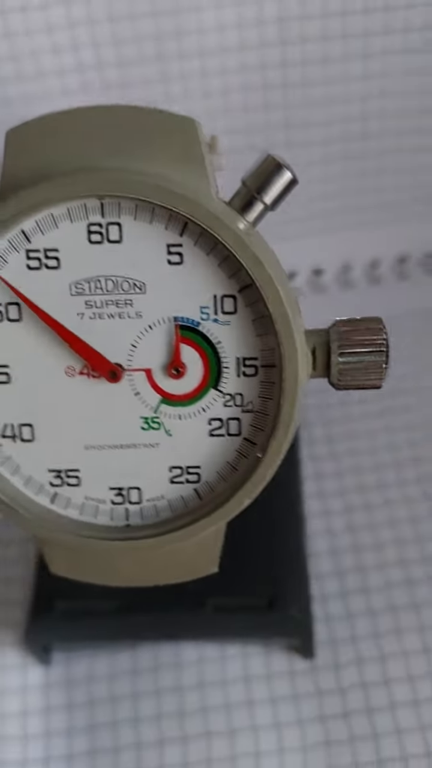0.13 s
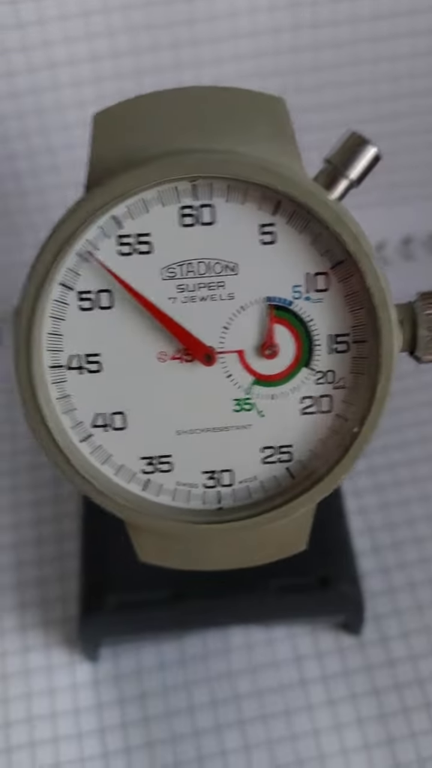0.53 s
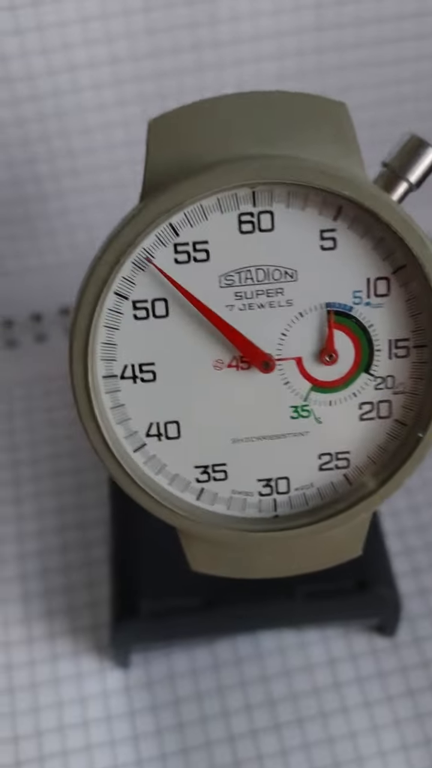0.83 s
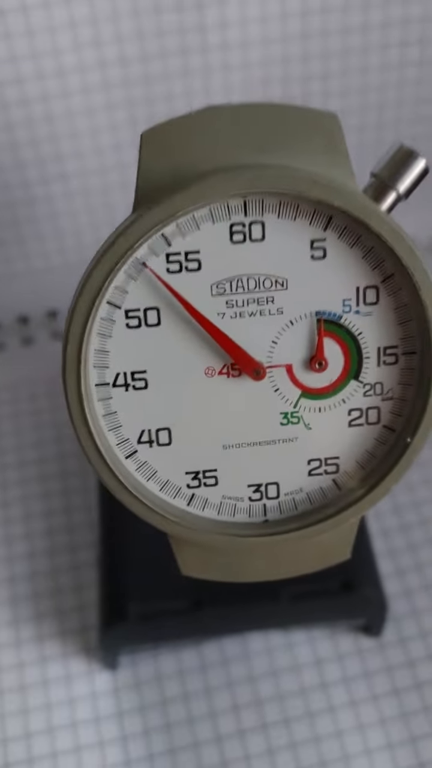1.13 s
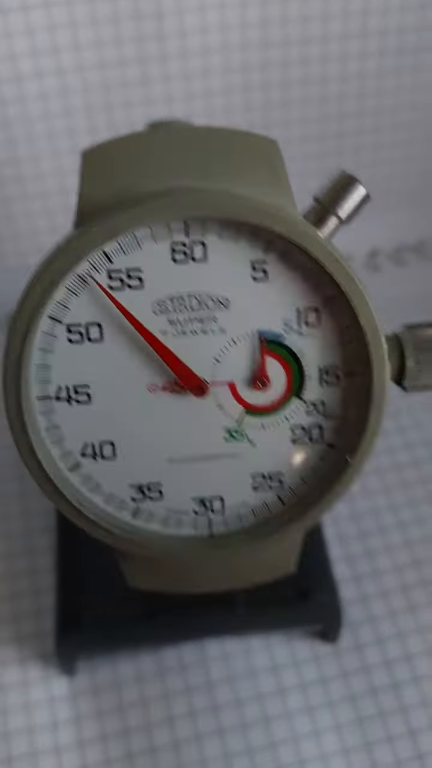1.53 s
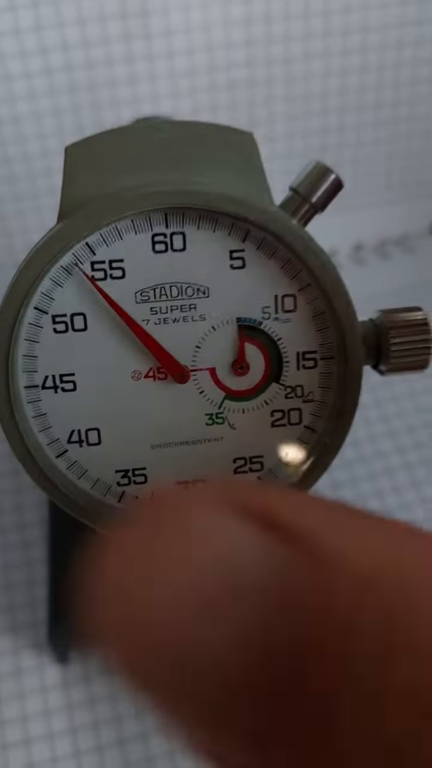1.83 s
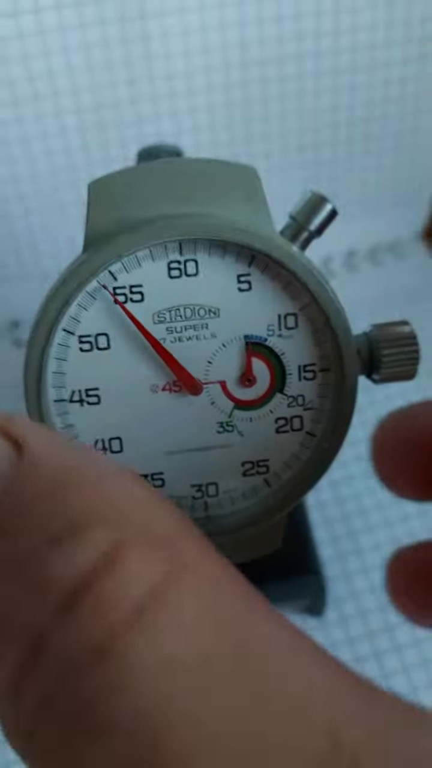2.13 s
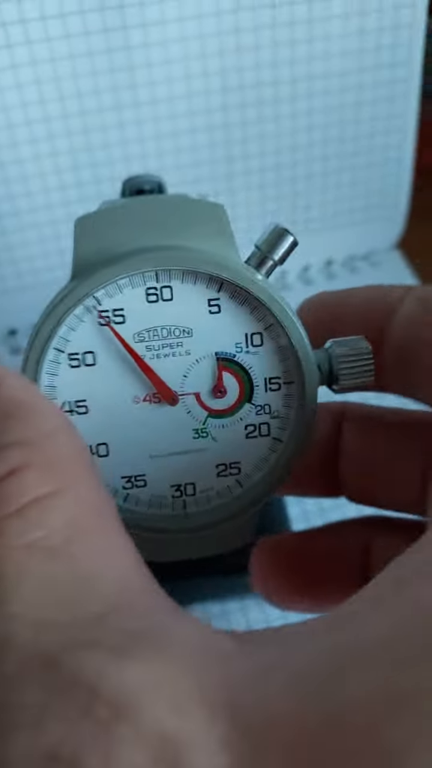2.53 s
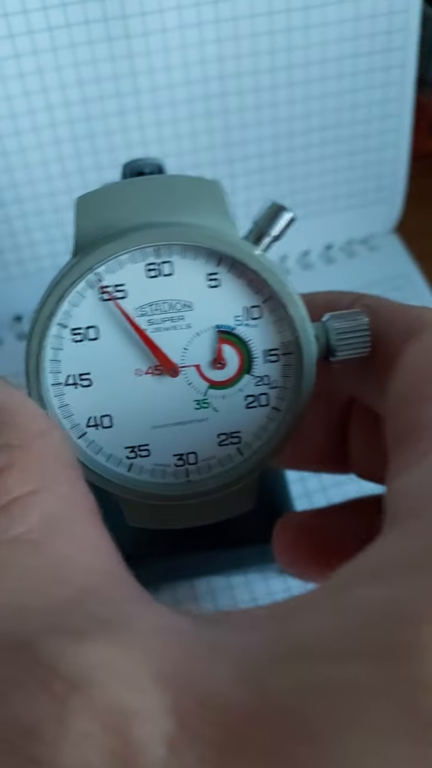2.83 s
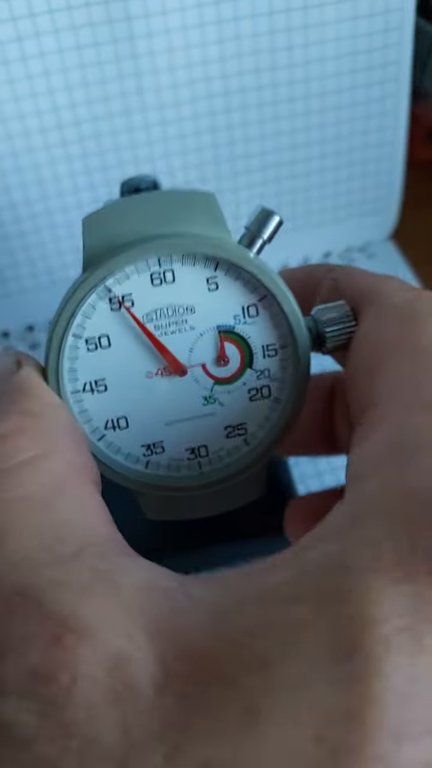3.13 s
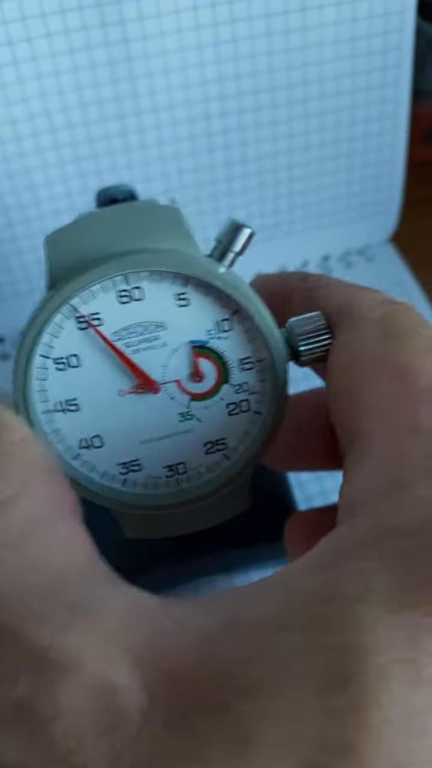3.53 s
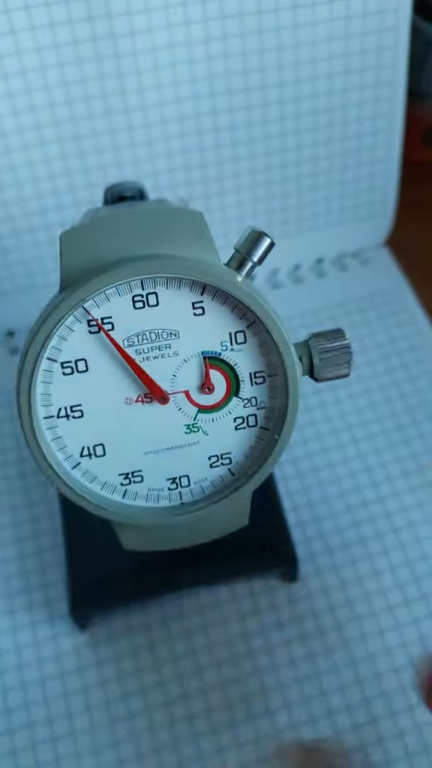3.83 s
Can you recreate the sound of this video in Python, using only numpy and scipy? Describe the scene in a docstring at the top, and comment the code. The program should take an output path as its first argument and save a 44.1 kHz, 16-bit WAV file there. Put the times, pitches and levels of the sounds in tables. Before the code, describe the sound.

A mechanical stopwatch ticks faintly, about five beats a second, close up in a quiet, hissy room with low handling rumble and very faint distant bird-like chirps. Fingers rub and knock the camera around 1.2-1.4 s, strongly on the right; a dull bump follows at 1.6. After a tiny creak at 3.14, the button snaps loudly at 3.34, spring ringing high; ticking stops. It clicks back at 3.57, with small rattles until 3.74.

```python
"""A quiet room, close up: a mechanical stopwatch ticks on its plastic stand, near a hand-held camera.
Ticks, taps, clacks and button strokes are short coloured noise bursts; spring, hum and thud are dying sines.
Fingers rub and knock on the camera, then slip on the watch: the button snaps down and the ticking stops.
The button clicks back and the watch rattles. Faint arched chirps, probably birds, come from far away.
Handling rumble, hiss and room air are shaped noise; short reflections and a diffuse tail place the watch."""
import sys
import numpy as np
from scipy import signal
from scipy.fft import rfft, irfft
from scipy.io import wavfile
from scipy.ndimage import uniform_filter1d

SR = 44100
rng = np.random.default_rng(int(sys.argv[2]) if len(sys.argv) > 2 else 0)


def store_wav(level_fs):
    """Save 16-bit WAV to argv[1]."""
    pcm = np.round(np.clip(np.atleast_2d(level_fs), -1, 1) * 32767)
    wavfile.write(sys.argv[1], SR, pcm.T.astype(np.int16))


N = 176400

# Throughout, side/dB is right minus left: the level belongs to the right channel.
# Spectra are relative: each sound's own level sets how loud it is.

# room air and hiss: spectrum on the right [f/Hz, level/dB]
FLOOR_COLOUR = [(59, -30), (100, 0), (147, -10), (197, -15), (266, -15), (415, -20), (461, -18), (648, -20),
                (1080, -21), (2080, -35), (3190, -34), (4290, -27), (5770, -28), (7140, -32), (8110, -41),
                (15000, -32), (16000, -38)]
# how much louder the air and hiss are on the right [f/Hz, side/dB]
FLOOR_SIDE = [(100, 3), (380, 8), (1300, 7), (2400, 5), (4400, 10), (8000, 7), (15000, 9)]
FLOOR_DB, FLOOR_DRIFT_DB = -66.5, 1.6
# handling rumble over time, before its trim [t/s, level/dB]
RUMBLE_LEVEL = [(0.0, -75), (0.03, -62), (0.21, -52), (0.3, -68), (0.44, -65), (0.54, -51), (0.62, -52),
                (0.68, -73), (0.79, -56), (0.86, -69), (1.0, -67), (1.06, -55), (1.19, -55), (1.25, -44),
                (1.37, -55), (1.45, -49), (1.54, -71), (1.58, -52), (1.92, -65), (1.96, -55), (2.25, -78),
                (2.36, -57), (3.1, -62), (3.14, -53), (3.26, -62), (3.35, -50), (3.38, -60), (3.6, -56),
                (3.82, -67), (4.0, -50)]
# rumble spectrum [f/Hz, level/dB]
RUMBLE_COLOUR = [(15, -45), (30, -22), (45, -6), (60, 0), (75, -4), (110, -17), (200, -33), (400, -55),
                 (1000, -80)]
RUMBLE_TRIM_DB, RUMBLE_SIDE_DB, RUMBLE_LIKENESS = 1.5, 2, .8
# escapement, two unlike beats [first drop t/s, drop level/dB, unlock lead/s, unlock level/dB]
BEATS = [(.1858, -50, .0125, -59), (.3828, -54, .008, -67)]
# tick spectrum [f/Hz, level/dB]
TICK_COLOUR = [(500, -25), (2500, -16), (4200, -4), (6500, 0), (8500, -11), (11500, 0), (13500, -2),
               (16000, -2)]
BALANCE_PERIOD_S, TICK_DECAY_S, UNLOCK_DECAY_S = .4, .0016, .0035
TICK_SIDE_DB, TICK_SPREAD_DB = 11, 1.5
# reflections off the table, notebook and hand [delay/s, level/dB]
NEARBY = [(.0042, -21), (.0068, -22), (.0093, -21), (.0135, -23), (.021, -26), (.029, -28)]
# decay of the room [f/Hz, t60/s]
ROOM_DECAY = [(200, .4), (800, .32), (2000, .21), (6000, .2), (15000, .18)]
ROOM_DB, ROOM_SIDE_DB, ECHO_GAP_S = -11, 2, .003
# far chirps, before the distance gains [t/s, length/s, level/dB, nominal f/Hz]
CHIRPS = [(.195, .06, -60, 4600), (.55, .07, -65, 4700), (.785, .06, -56.5, 4850), (1.08, .012, -56, 4800),
          (1.106, .016, -55, 4900), (1.13, .025, -59, 4950), (1.345, .06, -66, 5500),
          (1.79, .05, -69, 4700), (1.99, .06, -62, 4600), (2.125, .06, -67, 4400),
          (2.315, .05, -62.5, 4500), (2.56, .08, -70, 4900), (2.915, .06, -63.5, 4600)]
CHIRP_ARCH, CHIRP_WARBLE = .2, .12  # pitch swings, as fractions of the nominal pitch
CHIRP_WARBLE_HZ, CHIRP_SIDE_DB = 250, 6
YARD_T60_S, CHIRP_DIRECT_DB, CHIRP_ECHO_DB = .26, -7, -1
# fingers rub along the camera, before the channel balance and colour [t/s, length/s, level/dB]
RUBS = [(1.17, .15, -63), (1.33, .1, -63)]
# rubbing spectrum [f/Hz, level/dB]
RUB_COLOUR = [(150, 12), (500, 11), (1300, 4), (2500, 0), (6500, 2), (8500, -8), (11000, -2), (16000, -2)]
RUB_SIDE_DB = 9
# finger taps on the camera body [t/s, level/dB, decay/s]
TAPS = [(1.2135, -33, .0016), (1.2471, -15, .0006), (1.2500, -33, .0035), (1.2660, -45, .001),
        (1.2835, -50, .003), (1.2935, -53, .002)]
# tap spectrum [f/Hz, level/dB]
TAP_COLOUR = [(100, 4), (500, 5), (1400, 4), (2200, 1), (3000, 2), (5000, 1), (7000, 0), (8500, -11),
              (10500, -4), (16000, -7)]
TAP_SIDE_DB = 27
# thud of the camera body under the hardest tap [f/Hz, level/dB, t60/s, side/dB]
THUD = [(66, -43, .14, 6), (125, -29, .055, 23), (204, -24.5, .04, 28), (408, -26, .018, 28),
        (620, -27, .014, 26)]
THUD_S = 1.2448
# one soft bump further off [t/s, level/dB, decay/s, side/dB]
BUMP = (1.592, -52, .035, 4)
# bump spectrum [f/Hz, level/dB]
BUMP_COLOUR = [(60, -20), (170, -8), (240, 0), (340, -10), (500, -19), (750, -22), (1500, -40), (4000, -70)]
# fingers slip on the case [t/s, length/s, level/dB, peak slips per s]
CREAK = (3.139, .034, -51, 3000)
# modes of the plastic case [f/Hz, relative level/dB, t60/s]
CASE = [(937, 3, .035), (1230, -8, .02), (1450, -3, .025), (2820, 2, .008), (4300, -4, .003),
        (6500, -3, .002)]
# small clacks around both strokes, one just ahead of the press [t/s, level/dB, side/dB]
CLACKS = [(3.1787, -39.5, 4), (3.2330, -58, 6), (3.3052, -40, 6), (3.3408, -30, 3), (3.6298, -33, 2),
          (3.6400, -44, 2), (3.6462, -40, 2), (3.6568, -35.5, 2), (3.6790, -46, 2), (3.7378, -54, 7)]
# clack spectrum [f/Hz, level/dB]
CLACK_COLOUR = [(150, -8), (450, -6), (750, 6), (1100, 1), (1600, -3), (2700, 1), (4500, -4), (7000, -1),
                (8800, -9), (11000, -7), (16000, -5)]
CLACK_DECAY_S = .0021
# button going down [t/s, level/dB, decay/s, side/dB]
PRESS = (3.3424, -5, .0015, 2)
# press spectrum [f/Hz, level/dB]
PRESS_COLOUR = [(100, -22), (400, -20), (700, -11), (1300, -7), (1650, -11), (2100, -4), (2700, -5),
                (3400, -6), (4300, -1), (5100, -5), (6100, .5), (7500, -3), (8600, -10), (10500, -6),
                (11700, -13), (14500, -7), (16000, -16)]
# button coming back [t/s, level/dB, decay/s, side/dB]
RELEASE = (3.5697, -14.5, .0017, 7)
# release spectrum [f/Hz, level/dB]
RELEASE_COLOUR = [(100, -20), (450, -23), (1000, -11), (1700, -17), (2500, -3), (3300, -8), (5200, -9),
                  (6800, 0), (7700, -1), (8800, -10), (10300, -4), (11600, -7), (13000, 0), (16000, -6)]
# loosened case shivering on its stand, from the release on [level/dB, decay/s, side/dB]
SHIVER = (-42.5, .032, 4)
# shiver spectrum [f/Hz, level/dB]
SHIVER_COLOUR = [(150, -6), (450, -6), (800, 4), (1600, -6), (2600, 1), (4500, -3), (7000, -3), (8800, -9),
                 (10500, -3), (16000, -3)]
# spring set ringing by the press [f/Hz, level/dB, t60/s, side/dB]
SPRING = [(5254, -42, .28, 3), (5308, -27.5, .25, 7), (10488, -39, .25, -2)]
# low hum and brief mid-band ring under the press [f/Hz, level/dB, t60/s, side/dB]
PRESS_HUM = [(120, -46, .12, 4), (188, -43, .17, 5), (280, -42, .17, 3), (2066, -35, .025, -6),
             (2427, -36, .025, 4)]
# contacts at the two microphone ports
SNAP_ATTACK_S, PORT_LAG_S, PORT_LIKENESS = .0003, .00017, .6
LOW_CUT_HZ, EDGE_HZ = 35, 16300


def amp(db):
    """Decibels to gain."""
    return 10 ** (np.asarray(db) / 20)


def unit(x):
    """Scales to rms 1."""
    return x / np.sqrt(np.mean(x ** 2) + 1e-30)


def read(points, hz):
    """Reads a table on a log-frequency axis."""
    f, value = np.transpose(points)
    return np.interp(np.log(hz + 1), np.log(f + 1), value)


def add(mix, s, sound):
    """Mixes a sound in at time s, cut off at the end of the mix."""
    part = mix[..., round(s * SR):][..., :sound.shape[-1]]
    part += sound[..., :part.shape[-1]]


def sides(db):
    """Channel gains, the left one db below the right."""
    return amp([[-db], [0]])


def pair(likeness, size):
    """Two partly alike white noises, one for each microphone port."""
    a, b = rng.standard_normal((2, size))
    c = np.clip(likeness, -1, 1)
    return np.array([a, c * a + np.sqrt(1 - c * c) * b])


def tint(x, colour, size=4096):
    """Causal minimum-phase filter of unit power gain with the given spectrum."""
    gain = unit(amp(read(colour, abs(np.fft.fftfreq(size, 1 / SR)))))
    spectrum = np.exp(np.conj(signal.hilbert(np.log(gain + 1e-7))))
    taps = np.fft.ifft(spectrum).real[:size // 2]
    return signal.oaconvolve(x, taps[None], axes=1)[:, :x.shape[1]]


def snap(db, decay_s, side_db, colour, size=12000):
    """A contact: a very short shudder of many dense modes, reaching the left port first."""
    t = np.arange(size) / SR
    attack = 1 - np.exp(-t / min(SNAP_ATTACK_S, decay_s / 4))
    shape = attack * np.exp(-t / decay_s)
    z = rfft(pair(PORT_LIKENESS, size) * shape)
    # level the chance peaks of the spectrum, then fade what that smears out in time
    smooth = np.sqrt(uniform_filter1d(abs(z) ** 2, size=150) + 1e-12)
    burst = irfft(z / smooth, size) * np.exp(-(t / decay_s / 5) ** 2)
    burst *= np.linalg.norm(shape) / np.linalg.norm(burst, axis=1, keepdims=True)
    burst[1] = np.roll(burst[1], round(PORT_LAG_S * SR))
    return amp(db) * sides(side_db) * tint(burst, colour)


def ring(modes):
    """Dying sines of a struck part."""
    t = np.arange(SR) / SR
    out = np.zeros((2, SR))
    for hz, db, t60, side_db in modes:
        decay = np.exp(-np.log(1000) * t / t60)
        out += sides(side_db) * amp(db) * decay * np.sin(2 * np.pi * hz * t)
    return out


def echo(x, decay, size=256):
    """Diffuse reflections: a noise tail in which each band dies at its own speed."""
    hz, t, z = signal.stft(rng.standard_normal((2, SR)), SR, nperseg=size)
    fade = np.exp(-np.log(1000) * t / read(decay, hz)[:, None])
    tail = signal.istft(z * fade, SR, nperseg=size)[1]
    tail *= np.arange(tail.shape[1]) / SR > ECHO_GAP_S
    tail /= np.linalg.norm(tail, axis=1, keepdims=True)
    return signal.fftconvolve(x[None], tail, axes=1)[:, :N]


def room_tone(size=1024):
    """Hiss, and air whose low and middle bands drift slowly in level."""
    hz, t, z = signal.stft(pair(.05, N), SR, nperseg=size)
    drift = rng.standard_normal(z.shape[1:])
    for axis in (0, 1):
        drift = uniform_filter1d(drift, size=9, axis=axis)
    drift_db = FLOOR_DRIFT_DB * unit(drift) / (1 + (hz[:, None] / 2500) ** 2)
    z *= amp(read(FLOOR_COLOUR, hz)[:, None] + drift_db)
    z[0] *= amp(-read(FLOOR_SIDE, hz))[:, None]
    return amp(FLOOR_DB) * unit(signal.istft(z, SR, nperseg=size)[1][:, :N])


def handling_rumble():
    """The holding hand rumbles: low noise, evened out and then following a level curve."""
    s, db = np.transpose(RUMBLE_LEVEL)
    out = unit(tint(pair(RUMBLE_LIKENESS, N), RUMBLE_COLOUR, size=16384))
    out /= np.sqrt(uniform_filter1d((out ** 2).mean(0), size=3000) + .05)
    level_db = RUMBLE_TRIM_DB + np.interp(np.arange(N) / SR, s, db)
    return out * sides(RUMBLE_SIDE_DB) * amp(level_db)


def escapement():
    """Five beats a second, each an unlock and then a drop, until the button stops the watch."""
    out = np.zeros((2, N))
    for first, drop_db, lead, unlock_db in BEATS:
        for s in np.arange(first, PRESS[0], BALANCE_PERIOD_S):
            vary = TICK_SPREAD_DB * rng.standard_normal()
            add(out, s - lead, snap(unlock_db + vary, UNLOCK_DECAY_S, TICK_SIDE_DB, TICK_COLOUR))
            add(out, s, snap(drop_db + vary, TICK_DECAY_S, TICK_SIDE_DB, TICK_COLOUR))
    return out


def reflections(watch):
    """The watch comes back from nearby surfaces as delayed copies and from the room as a diffuse tail."""
    mono = watch.sum(0) / np.sqrt(2)
    out = amp(ROOM_DB) * sides(ROOM_SIDE_DB) * echo(mono, ROOM_DECAY)
    for delay, db in NEARBY:
        add(out, delay, amp(db) * watch)
    return out


def birds():
    """Arched chirps, raspy from random pitch wobble and smeared by distance."""
    out = np.zeros(N)
    low_pass = signal.butter(2, CHIRP_WARBLE_HZ, fs=SR, output="sos")
    rasp = unit(signal.sosfilt(low_pass, rng.standard_normal(N)))
    for s, length, db, hz in CHIRPS:
        arch = np.sin(np.pi * np.arange(0, length, 1 / SR) / length)
        wobble = CHIRP_WARBLE * rasp[round(s * SR):][:len(arch)]
        pitch = hz * (1 + CHIRP_ARCH * (arch - np.pi / 4) + wobble)
        tone = np.sin(2 * np.pi * np.cumsum(pitch) / SR)
        add(out, s, amp(db) * np.sqrt(2 * abs(arch)) * tone)
    direct = amp(CHIRP_DIRECT_DB) * out
    far = amp(CHIRP_ECHO_DB) * echo(out, [(4500, YARD_T60_S)])
    return sides(CHIRP_SIDE_DB) * (direct + far)


def rubbing(grain_db=5):
    """Skin slides over the camera body in fine, uneven grains."""
    out = np.zeros((2, N))
    for s, length, db in RUBS:
        swell = np.sin(np.pi * np.arange(0, length, 1 / SR) / length)
        grains = pair(.3, len(swell)) * amp(grain_db * rng.standard_normal(len(swell)))
        add(out, s, amp(db) * swell * unit(grains))
    return sides(RUB_SIDE_DB) * tint(out, RUB_COLOUR)


def camera_taps():
    """Fingers tap the body beside the right microphone port; low modes thud under the hardest tap."""
    out = np.zeros((2, N))
    for s, db, decay_s in TAPS:
        add(out, s, snap(db, decay_s, TAP_SIDE_DB, TAP_COLOUR))
    add(out, THUD_S, ring(THUD))
    return out


def soft_bump():
    """One dull contact further off, a slower burst of low noise."""
    out = np.zeros((2, N))
    add(out, BUMP[0], snap(*BUMP[1:], BUMP_COLOUR))
    return out


def grip(side_db=6, spread_db=3):
    """Uneven slips of the fingers swell, ring the plastic case and stop."""
    start, length, db, rate = CREAK
    swell = np.sin(np.pi * np.clip((np.arange(N) / SR - start) / length, 0, 1))
    slips = swell * (rng.random(N) < rate / SR) * amp(spread_db * rng.standard_normal(N))
    case = ring([(*mode, side_db) for mode in CASE])
    sound = signal.fftconvolve(slips[None], case, axes=1)[:, :N]
    sound = signal.sosfilt(signal.butter(4, 850, "high", fs=SR, output="sos"), sound)
    return amp(db) * sound * np.sqrt(length * SR) / np.linalg.norm(sound[1])


def clacks():
    """Small clacks around both button strokes, each a short burst of dense modes."""
    out = np.zeros((2, N))
    for s, db, side_db in CLACKS:
        add(out, s, snap(db, CLACK_DECAY_S, side_db, CLACK_COLOUR))
    return out


def button():
    """The button snaps down and back; the case, loosened, shivers on its stand after the release."""
    out = np.zeros((2, N))
    add(out, PRESS[0], snap(*PRESS[1:], PRESS_COLOUR))
    add(out, RELEASE[0], snap(*RELEASE[1:], RELEASE_COLOUR))
    add(out, RELEASE[0], snap(*SHIVER, SHIVER_COLOUR))
    return out


def spring_and_hum():
    """The press leaves the spring singing, over a low hum and a brief mid-band ring."""
    out = np.zeros((2, N))
    add(out, PRESS[0], ring(SPRING) + ring(PRESS_HUM))
    return out


def scene():
    """The watch with its near and room reflections, the camera and the background."""
    background = room_tone() + birds() + soft_bump()
    camera = handling_rumble() + rubbing() + camera_taps()
    watch = escapement() + grip() + clacks() + button()
    return background + camera + watch + reflections(watch) + spring_and_hum()


def record(dry):
    """The recorder's low cut and band limit."""
    dry = signal.sosfilt(signal.butter(3, LOW_CUT_HZ, "high", fs=SR, output="sos"), dry)
    band_limit = signal.firwin(255, EDGE_HZ, window=("kaiser", 8), fs=SR)
    return signal.oaconvolve(dry, band_limit[None], "same")


dry = scene()
out = record(dry)
store_wav(out)
```